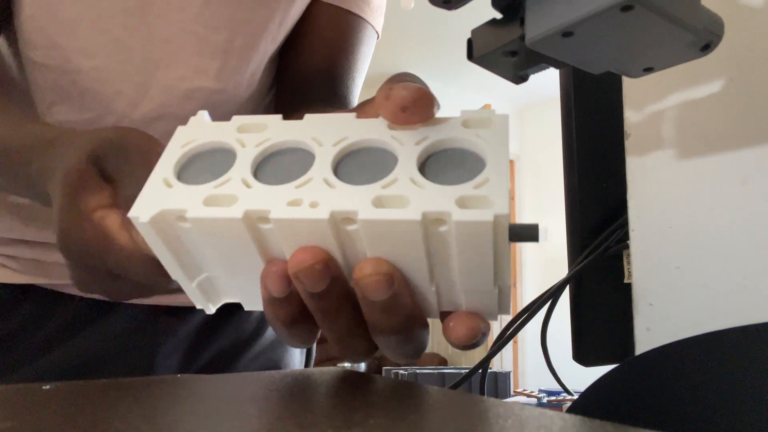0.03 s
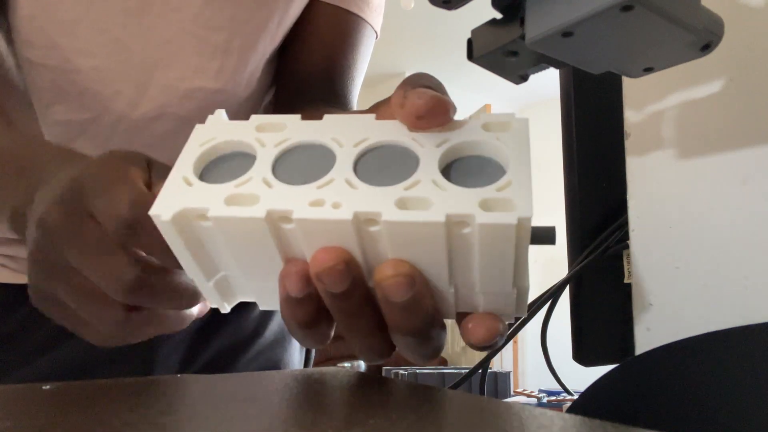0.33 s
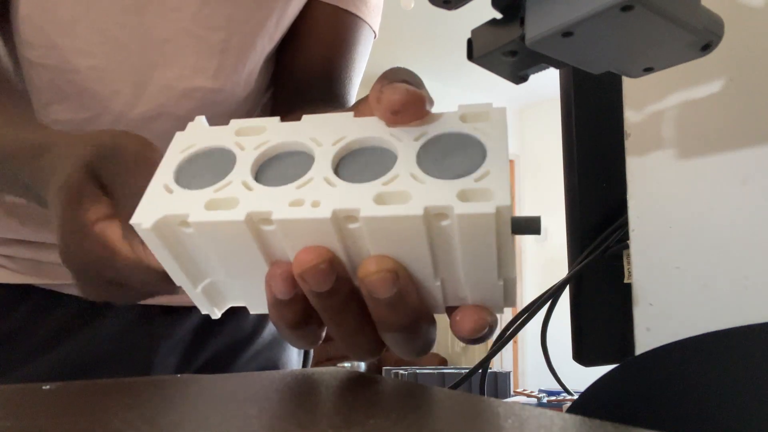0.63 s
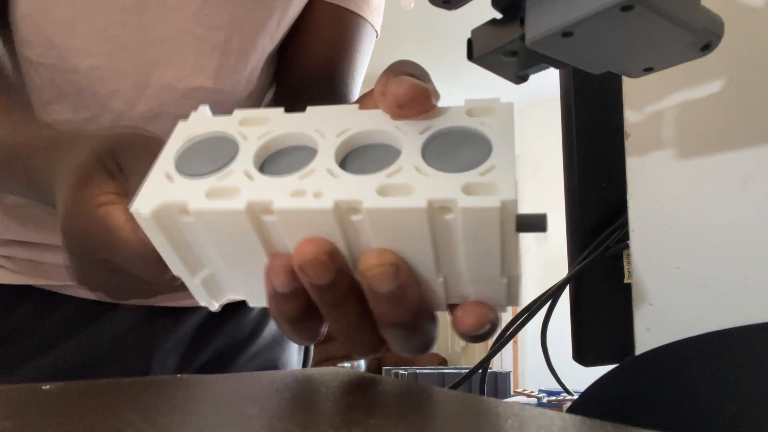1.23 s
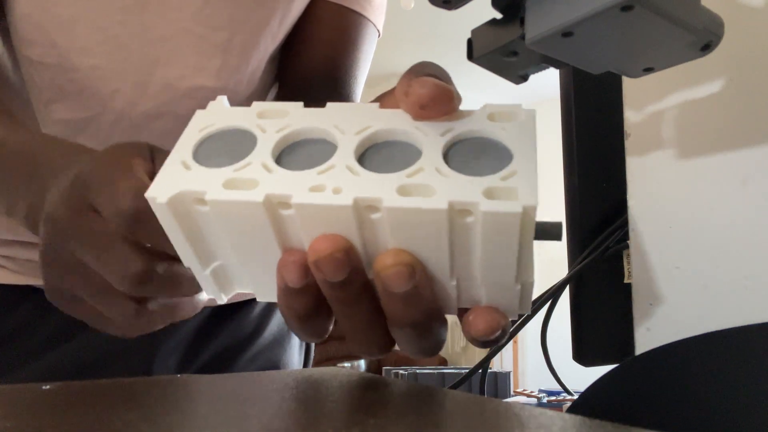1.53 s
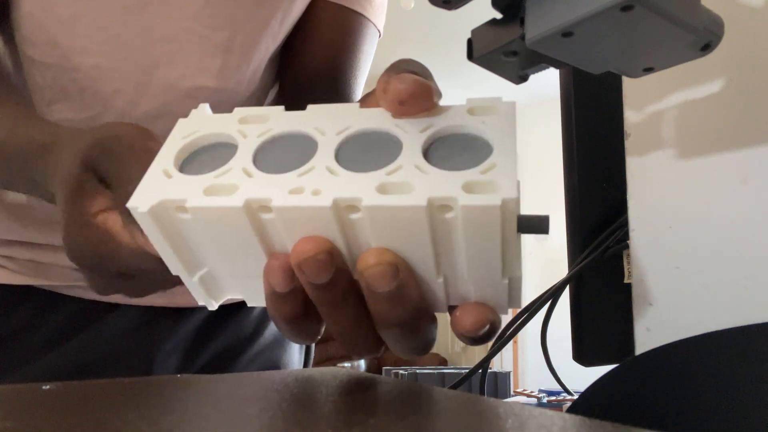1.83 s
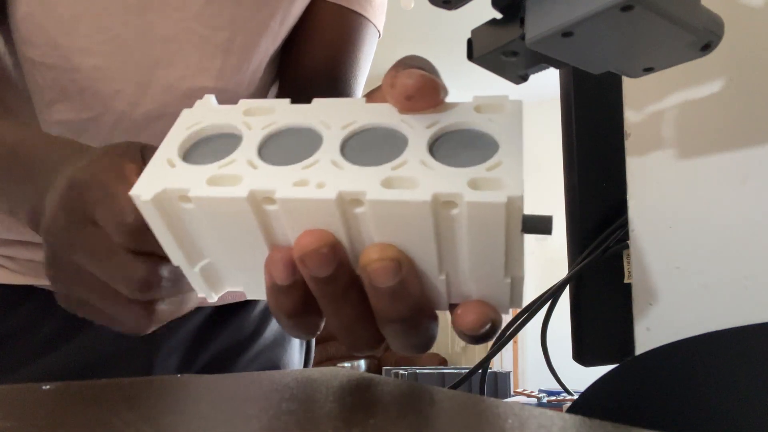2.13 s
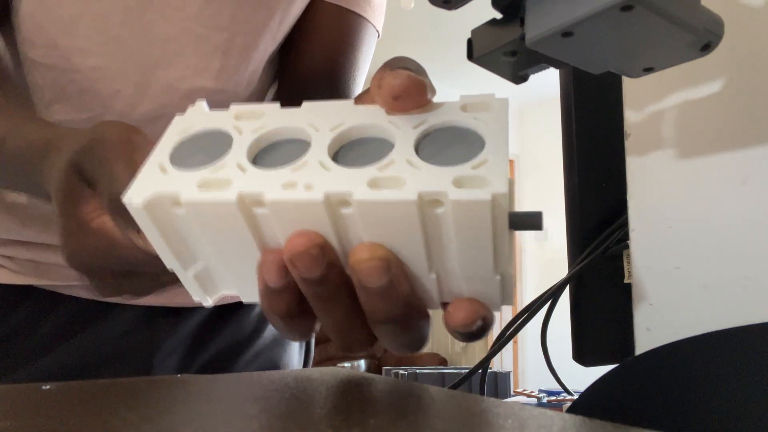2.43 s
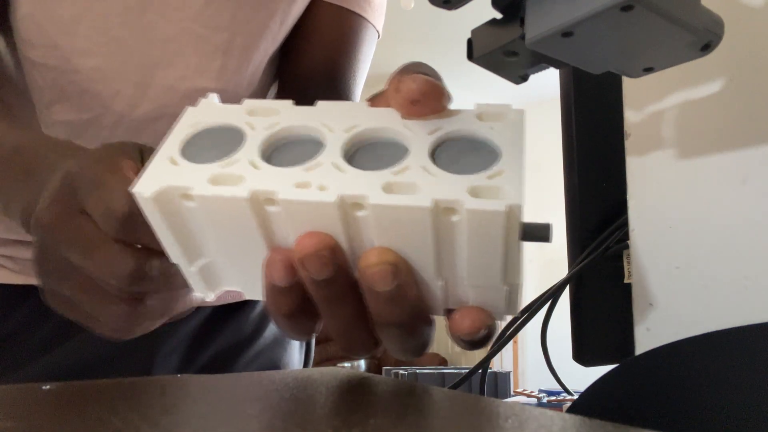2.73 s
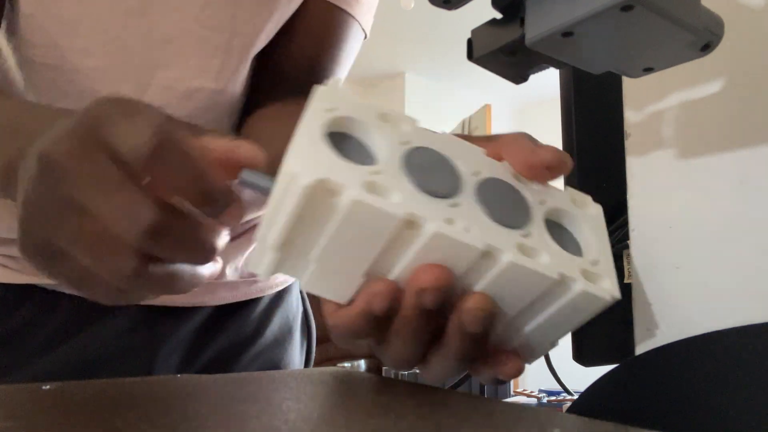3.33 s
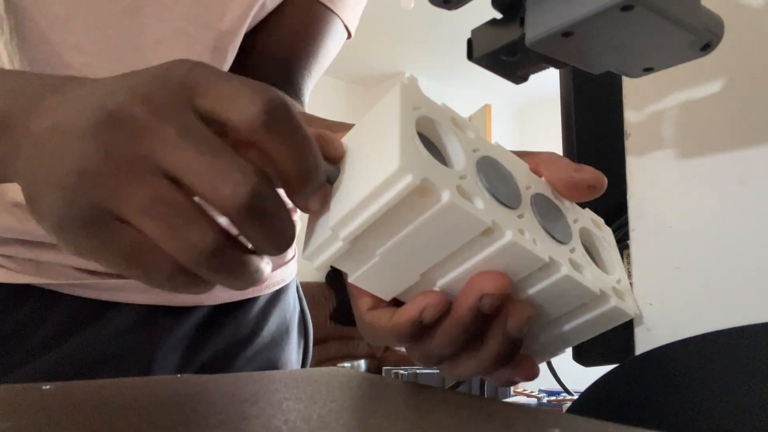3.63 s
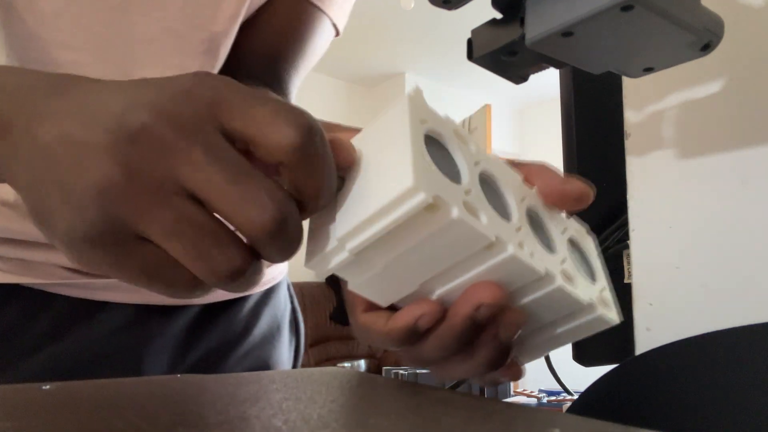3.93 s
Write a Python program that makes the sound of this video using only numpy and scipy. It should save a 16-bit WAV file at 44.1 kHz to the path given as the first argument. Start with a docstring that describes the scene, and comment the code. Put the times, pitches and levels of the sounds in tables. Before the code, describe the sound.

A plastic model engine is cranked by hand close by, its dry pistons scraping and ticking in bursts about every half second, with soft sliding between. Near 1.1 and 2.3 seconds a brief rising rub ends in a loud clatter and dull, hollow knocks. From about 3 to 4 seconds the model is tilted, giving scattered ticks, knocks and short scrapes. The small room echoes slightly and hums low throughout.

```python
"""A printed plastic model engine is cranked by hand close by, about one half turn every 0.55 s.
From the start, dry pistons and crank stick and slip in the hollow block, and parts catch with ticks.
Between pushes they slide softly. Near 1.1 s and 2.3 s, once a revolution, a rub rises in pitch and
the slack is taken up in a loud clatter, with dull knocks. Last, the model is tilted, with more ticks
and knocks. All along, a small room echoes and hums low."""
import sys
import numpy as np
from scipy import signal
from scipy.fft import rfft, irfft
from scipy.io import wavfile

SR = 44100
rng = np.random.default_rng(int(sys.argv[2]) if len(sys.argv) > 2 else 0)


def pcm_store(signal):
    """Save signal as 16-bit PCM."""
    levels = np.round(np.clip(np.atleast_2d(signal), -1, 1) * 32767)
    wavfile.write(sys.argv[1], SR, levels.astype(np.int16).T)


N = 176400  # 4 seconds


# A few scrapes to each push of the crank. Each row: start in seconds, length in seconds,
# relative level in dB at the hardest point, where that point lies (0 = start, 1 = end).
SCRAPES = [(.005,0.072,-18,0), (.08,0.023,-26,0.5), (.43,0.084,-20,0.23), (.532,0.081,-16,0.8),
           (.628,0.031,-15,0.16), (1.018,0.036,-33.5,0.94), (1.045,0.12,-24,0.47), (1.15,0.12,-27,0.13),
           (1.276,0.014,-20.5,0.8), (1.292,0.018,-25,0.93), (1.619,0.064,-15,0.58), (1.68,0.08,-23,0.18),
           (1.758,0.094,-21,0.97), (2.128,0.018,-25,0), (2.16,0.11,-19,0.39), (2.253,0.087,-17,0.84),
           (2.333,0.03,-21,0.1), (2.482,0.021,-31,0.07), (2.744,0.062,-26,0), (2.768,0.082,-18,0.77),
           (2.844,0.062,-21,0.87), (2.91,0.057,-24,0.1), (3.088,0.034,-28,0.6), (3.423,0.012,-35,0.13),
           (3.833,0.067,-29.5,0.2), (3.903,.026,-16,0.27), (3.964,0.034,-22,1)]

def scraping(level_db=0.5, edge_db=5.5, bite_db=5, bite_s=0.0068, ramp_s=0.0024, size=6000):
    """Ridged plastic drags over plastic: each scrape swells, brightens with force and lets go."""
    out, t = np.zeros(N), np.arange(size) / SR
    grain = slips(per_s=3000, spread_db=2.5) * gain(2.9 * wander(per_s=300))
    for k, (at, length, db, hardest) in enumerate(SCRAPES):
        force_db = db - np.interp(t / length, [0, hardest, 1], [edge_db, 0, edge_db])
        force_db -= bite_db * np.exp(-t / min(bite_s, length / 6))  # weaker until it takes hold
        contact = np.clip(t / ramp_s, 0, 1) * np.exp(-np.maximum(t - length, 0) / ramp_s)
        drag = normalise(grain[k * size:(k + 1) * size]) * contact * gain(force_db + level_db)
        drag = brighten(drag, treble_db=12 + 0.7 * force_db)
        add(out, at, through(drag, block_ring()))
    return out


# Parts catching. Each row: start in seconds, relative level in dB, treble change in dB.
TICKS = [(.014,-9.5,2.5), (.059,-8.5,4), (.446,-19.5,14), (0.487,-21,14), (.502,-26.5,19), (0.58,-13,8.5),
         (.598,-7.5,-1), (.637,-14.5,9.5), (.653,-24.5,11), (.709,-31.5,7), (0.773,-29,-13.5),
         (0.8,-39,7.5), (1.048,-24.5,12), (1.106,-18.5,12), (1.115,-17.5,9), (1.396,-37,4), (1.667,-10,-4),
         (1.706,-25.5,10), (1.735,-26.5,9.5), (1.975,-32.5,-5.5), (2.197,-20,8.5), (2.245,-19.5,12),
         (2.274,-12,2), (2.719,-21,-1), (3.098,-23,6.5), (3.586,-17.5,-1.5), (3.68,-34.5,-22),
         (3.721,-41,-15), (3.763,-16.5,5.5), (3.772,-13,-9), (3.874,-34,11.5), (3.913,-14.5,5.5),
         (3.954,-14,7)]

def ticks(boost_db=16, size=1024):
    """A caught part snaps free with a few milliseconds of chatter."""
    out = np.zeros(N)
    for at, db, treble_db in TICKS:
        snap = dying_noise(fade_s=0.0084, size=size) * np.sqrt(np.arange(size))
        snap = brighten(snap / np.linalg.norm(snap), treble_db)
        add(out, at, gain(db + boost_db) * through(snap, block_ring()))
    return out


# Bursts of rattling. Each row: start in seconds, length in seconds, level in dB.
CLATTERS = [(1.132,.013,-6.5), (2.312,0.0086,-6), (2.321,0.0058,-4)]

def clatters():
    """Loose parts bounce against each other as the slack is taken up."""
    t = np.arange(N) / SR
    force = sum(gain(db) * ((t >= at) & (t < at + length)) for at, length, db in CLATTERS)
    return through(force * slips(per_s=4300, spread_db=1.5), block_ring())


# The hollow block's notes. Each row: pitch in Hz, relative level in dB, seconds to fade by 60 dB.
BLOCK_NOTES = [(486.7,-19.5,0.055), (1059,-10,0.022), (1297,-21,.045), (1811,-14.5,.035), (3517,-12.5,.028),
               (4750,-11,0.027), (4910,-15.5,0.038), (5920,-14.5,0.058), (6148,-11,0.031), (6503,-4,0.013)]

def block_ring(notes_db=-10, walls_db=-9.5, spread_db=1.5, size=4096):
    """Each spot touched gives a crack, its own mix of the block's notes and a brief ring of the walls."""
    t = np.arange(size) / SR
    notes = np.zeros(size)
    for hz, db, fade_s in BLOCK_NOTES:
        strength = gain(db + spread_db * rng.standard_normal())
        notes += strength * np.cos(2 * np.pi * (hz * t + rng.random())) * fade(t, fade_s)
    walls = dying_noise(fade_s=0.041, size=size)
    ring = gain(notes_db) * notes / np.linalg.norm(notes) + gain(walls_db) * walls
    ring[0] += 1  # the crack
    return ring / np.linalg.norm(ring)


# The tone of the contacts as heard. Each row: frequency in Hz, relative level in dB.
CONTACT_TONE = [(60,-40), (150,-13.5), (250,-7.5), (470,-0.5), (760,-4.5), (1100,0), (1900,0), (2900,-4.5),
                (4100,-4.5), (4800,0), (6300,.5), (6950,-6.5), (7600,-23.5), (8400,-24.5), (9900,-18.5),
                (11500,-31.5), (15500,-31.5)]

def contact_tone(contacts):
    """The contacts have a strong middle, weak bass and a steep drop above 7 kHz from the microphone."""
    return through(contacts, tone_filter(CONTACT_TONE))


# Dull blows on the block. Each row: start in seconds, relative level in dB, bass change in dB.
KNOCKS = [(1.144,-13,3), (1.283,-19,-25), (2.319,-18.5,-4.5), (2.328,-9.5,0.5), (3.105,-23.5,-6.5),
          (3.588,-15.5,-16), (3.992,-16,-11)]
# The tone of the hollow inside. Each row: frequency in Hz, relative level in dB.
HOLLOW_TONE = [(60, -23.5), (200, -5), (480, 10), (750, 7.5), (1100, -18.5), (2000, -8), (4000, -23.5),
               (9000, -51)]
# Low notes of the whole body. Each row: pitch in Hz, relative level in dB.
BODY_NOTES = [(195,-22.5), (243,-19.5), (301,-17)]

def knocks(boost_db=19.5, thump_hz=80, thump_db=-19.5):
    """Blunt blows sound the hollow block; heavy ones also thump and leave the whole body ringing."""
    blows, bass = np.zeros((2, N))
    t = np.arange(N) / SR
    body = sum(gain(db) * np.sin(2 * np.pi * hz * t) for hz, db in BODY_NOTES) * fade(t, fade_s=0.24)
    thump = gain(thump_db) * np.sin(2 * np.pi * thump_hz * t) * fade(t, fade_s=0.05)
    for at, db, bass_db in KNOCKS:
        add(blows, at, gain(db + boost_db) * dying_noise(fade_s=0.017))
        add(bass, at, gain(db + bass_db) * (thump + body))
    return through(blows, tone_filter(HOLLOW_TONE)) + bass


# A piston nears the end of its tube. Each row: start in seconds, length in seconds, midway level in dB.
RUBS = [(1.02,0.14,-29), (2.203,0.088,-34)]

def piston_rubs(start_hz=470, end_hz=1209, swell_db=17.5):
    """The air space in the tube shrinks, so its pitch climbs while the rub grows."""
    out = np.zeros(N)
    for at, length, db in RUBS:
        travel = progress(at, length)
        rub = noise_band(start_hz * (end_hz / start_hz) ** travel, width_hz=240)
        out += rub * np.sqrt(hump(at, length)) * gain(db + swell_db * (travel - 0.5))
    return out


# Soft slides. Each row: start in seconds, length in seconds, whisper level in dB, swish level in dB.
SLIDES = [(0.13,0.086,-45.5,-65), (0.245,0.57,-61.5,-76), (0.762,0.22,-50.5,-62), (1.314,0.33,-51.5,-66),
          (1.927,0.21,-50,-60), (2.38,0.098,-49,-82), (2.496,0.25,-52,-67), (3.561,0.54,-60,-88)]
# Faint squeaks. Each row: start in seconds, length in seconds, level in dB.
SQUEAKS = [(.27,0.19,-64), (3.147,0.19,-60)]
# The tone of the whisper. Each row: frequency in Hz, relative level in dB.
WHISPER_TONE = [(300,-8), (1050,-7), (1550,-8), (2020,7), (2450,-10), (3200,1.5), (4050,3), (5300,-0.5),
                (6500,11.5), (7700,-7.5), (10000,-6.5), (12000,-25), (15500,-27.5)]

def sliding(fade_db_per_s=-30, swish_power=5.9):
    """Between pushes the parts whisper along and sometimes squeak; a high swish follows their speed."""
    t = np.arange(N) / SR
    force, swish = np.zeros((2, N))
    for at, length, db, swish_db in SLIDES:
        speed = hump(at, length)
        from_middle_s = np.clip(t - at - length / 2, -length, length)
        force += np.sqrt(speed) * gain(db + fade_db_per_s * from_middle_s)
        swish += speed ** swish_power * gain(swish_db)
    friction = force * rng.standard_normal(N) * gain(3.9 * wander(per_s=24))
    whisper = through(friction, tone_filter(WHISPER_TONE))
    squeak_level = sum(hump(at, length) * gain(db) for at, length, db in SQUEAKS)
    squeak = squeak_level * noise_band(hz=3900, width_hz=210)
    return whisper + squeak + swish * noise_band(hz=13000, width_hz=4700)


def room_echo(sound, delay_s=0.008, level_db=-15):
    """The small room sends the sound back a little later, softer and duller."""
    out = np.zeros(N)
    echo = lowpass(through(sound, dying_noise(fade_s=0.35)), hz=7500)
    add(out, delay_s, gain(level_db) * echo)
    return out


# The tone of the room's air. Each row: frequency in Hz, relative level in dB.
AIR_TONE = [(25,-33), (55,-11), (80,-7.5), (97,6.5), (118,-4), (200,-6), (330,-23.5), (1800,-23.5),
            (3000,-32.5), (6300,-26), (8000,-35), (15500,-50.5)]

def room_hum(hum_hz=99.3, hum_db=-65, octave_db=-67.5, air_db=-55.5):
    """A low hum wavers in pitch and level over the soft rush of the room's air."""
    phase = 2 * np.pi * np.cumsum(hum_hz * (1 + 0.025 * wander(per_s=22))) / SR
    hum = gain(hum_db) * np.sin(phase) + gain(octave_db) * np.sin(2 * phase)
    hum *= gain(3 * wander(per_s=14))
    return hum + gain(air_db) * through(rng.standard_normal(N), tone_filter(AIR_TONE))


def gain(db):
    """Turn decibels into a number to multiply by."""
    return 10 ** (np.asarray(db) / 20)


def normalise(x):
    """Scale to an average (rms) level of 1."""
    return x / np.sqrt(np.mean(x ** 2))


def add(out, at, x):
    """Mix x into out at a time in seconds."""
    i = max(int(at * SR), 0)
    out[i:i + len(x)] += x[:max(N - i, 0)]


def through(x, response):
    """Pass a sound through a ring, echo or filter."""
    return signal.fftconvolve(x, response)[:N]


def lowpass(x, hz):
    """Soften everything above hz."""
    return signal.sosfilt(signal.butter(2, hz, fs=SR, output="sos"), x)


def brighten(x, treble_db, above_hz=3800):
    """Turn the treble up or down: harder contact sounds brighter."""
    low = signal.sosfiltfilt(signal.butter(2, above_hz, fs=SR, output="sos"), x)
    return low + gain(treble_db) * (x - low)


def tone_filter(points, size=4096):
    """Turn a tone table into a filter with a total energy of 1."""
    hz, db = np.array(points, float).T
    curve = gain(np.interp(np.log(np.fft.rfftfreq(size, 1 / SR) + 1), np.log(hz), db))
    cepstrum = irfft(np.log(curve))
    cepstrum[1:size // 2] *= 2  # fold it so the filter rings only after a hit
    cepstrum[size // 2 + 1:] = 0
    return normalise(irfft(np.exp(rfft(cepstrum)))) / np.sqrt(size)


def fade(t, fade_s):
    """Fall by 60 dB every fade_s seconds."""
    return np.exp(-np.log(1000) * t / fade_s)


def dying_noise(fade_s, size=32768):
    """Fading noise with a total energy of 1."""
    x = rng.standard_normal(size) * fade(np.arange(size) / SR, fade_s)
    return x / np.linalg.norm(x)


def wander(per_s):
    """Drift at random, mostly between -1 and 1."""
    return np.interp(np.arange(N) / SR * per_s, np.arange(N), rng.standard_normal(N))


def slips(per_s, spread_db):
    """Tiny uneven clicks of surfaces that stick and slip."""
    clicks = (rng.random(N) < per_s / SR) * rng.choice([-1, 1], N)
    return normalise(clicks * gain(spread_db * np.clip(rng.standard_normal(N), -2, 2)))


def noise_band(hz, width_hz):
    """Noise around a pitch that may move."""
    phase = 2 * np.pi * np.cumsum(hz * np.ones(N)) / SR
    return normalise(lowpass(rng.standard_normal(N), width_hz / 2) * np.cos(phase))


def progress(at, length):
    """Climb steadily from 0 to 1 during an event."""
    return np.clip((np.arange(N) / SR - at) / length, 0, 1)


def hump(at, length):
    """A smooth rise and fall."""
    return np.abs(np.sin(np.pi * progress(at, length)))


def scene():
    """The model engine, the room's echo and its hum, in one channel."""
    engine = contact_tone(scraping() + ticks() + clatters()) + piston_rubs() + knocks() + sliding()
    return (engine + room_echo(engine) + room_hum())[None]


def record(dry, ceiling=1.7, top_hz=15800):
    """The microphone rounds off the loudest peaks and cuts the highest treble."""
    rounded = dry / (1 + (dry / ceiling) ** 4) ** (1 / 4)
    return signal.sosfilt(signal.ellip(8, .2, 70, top_hz, fs=SR, output="sos"), rounded)


dry = scene()
out = record(dry)
pcm_store(out)
```